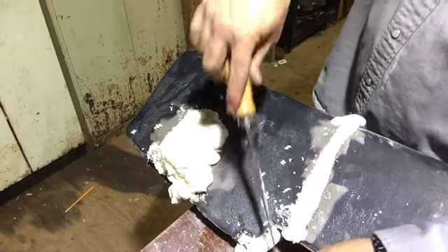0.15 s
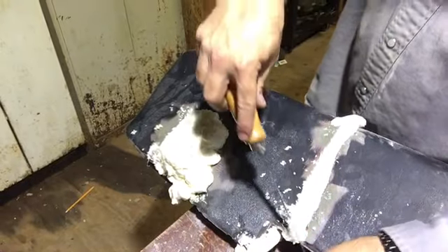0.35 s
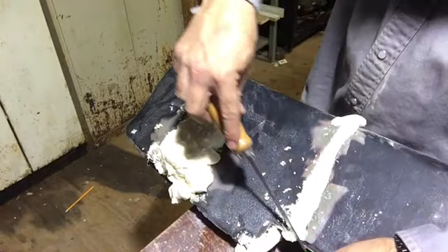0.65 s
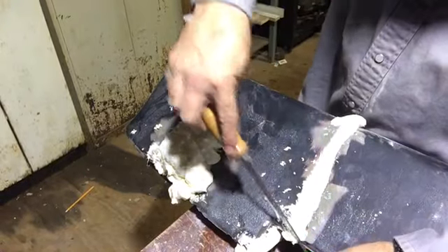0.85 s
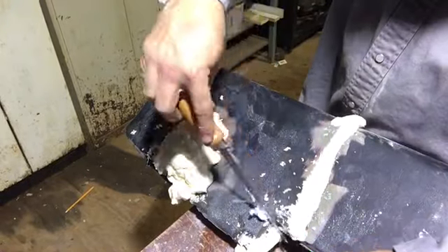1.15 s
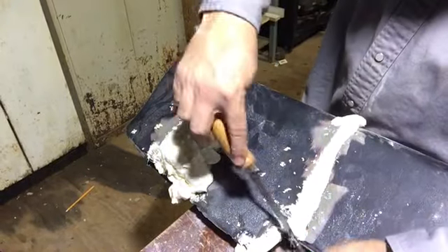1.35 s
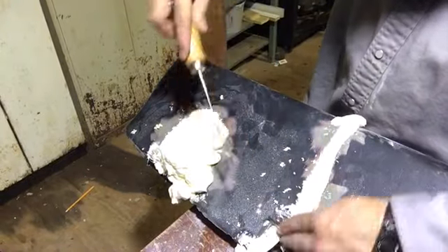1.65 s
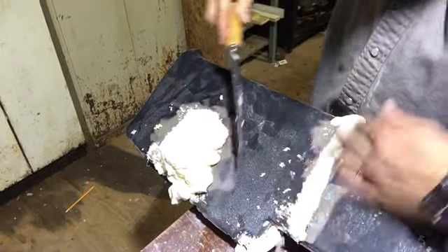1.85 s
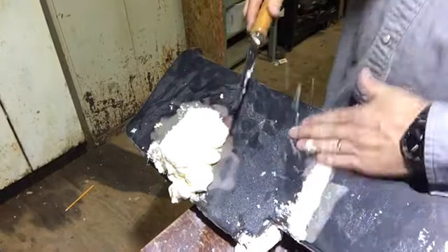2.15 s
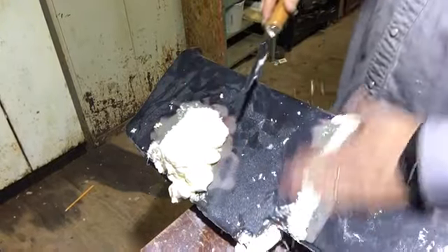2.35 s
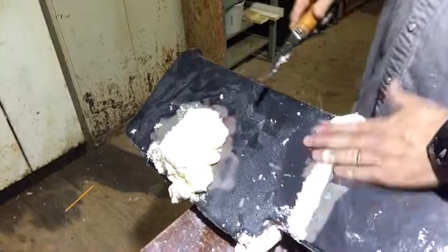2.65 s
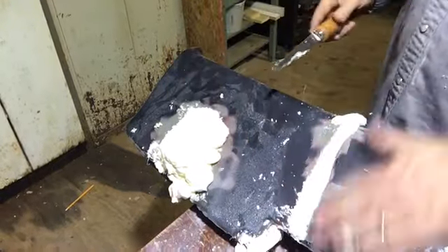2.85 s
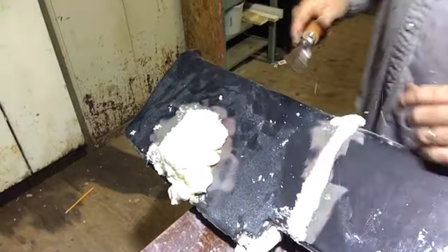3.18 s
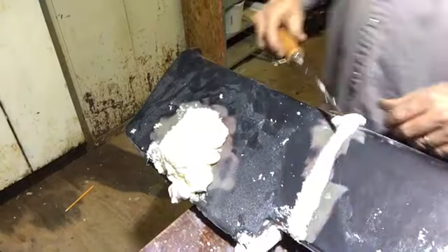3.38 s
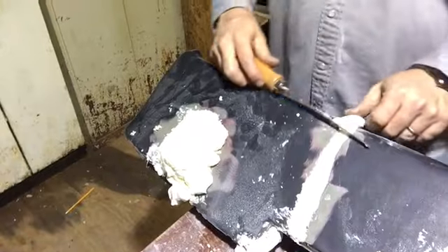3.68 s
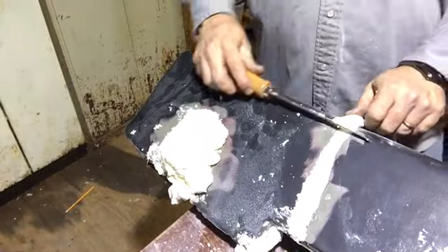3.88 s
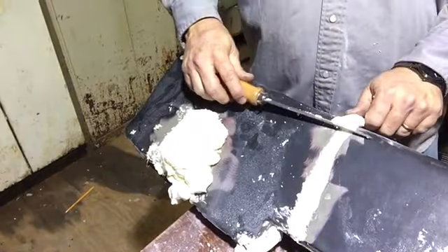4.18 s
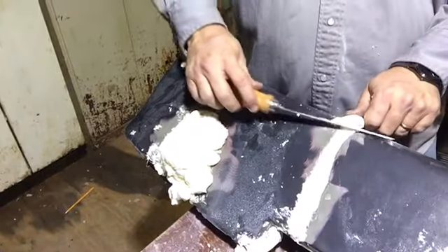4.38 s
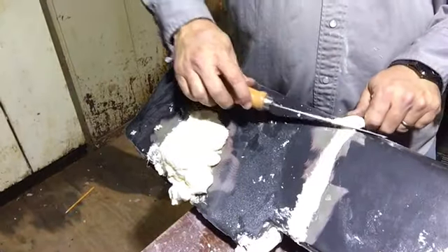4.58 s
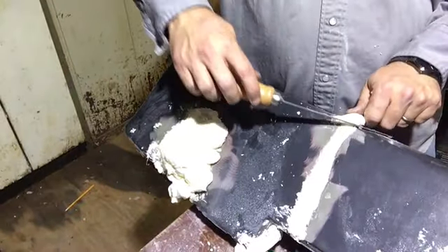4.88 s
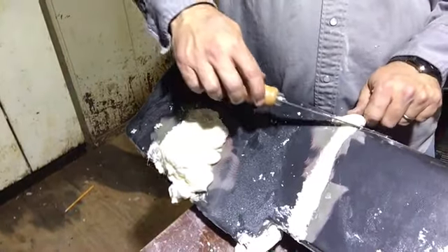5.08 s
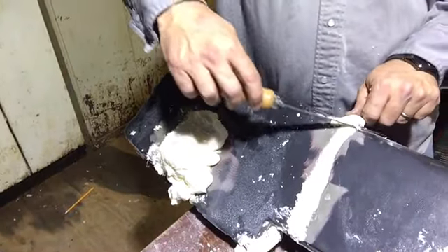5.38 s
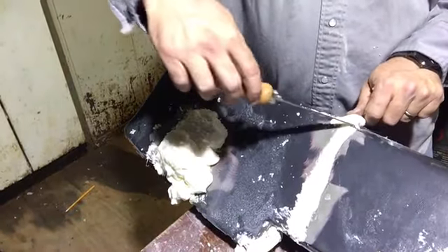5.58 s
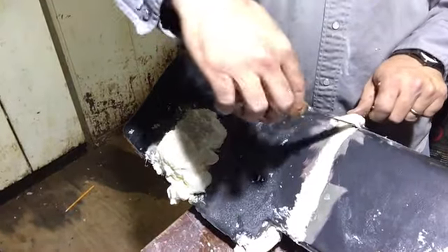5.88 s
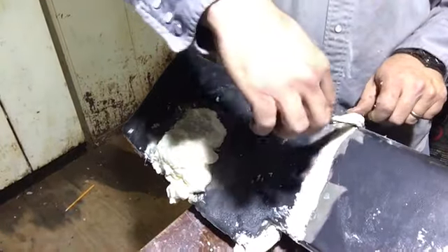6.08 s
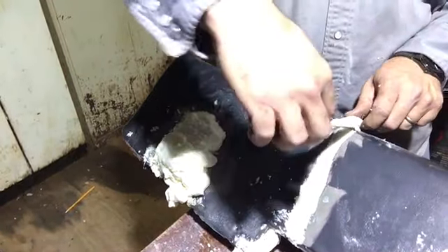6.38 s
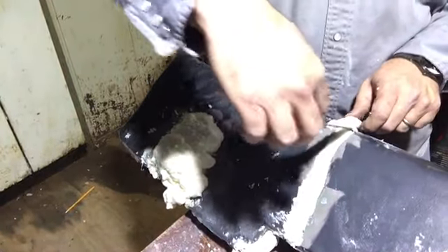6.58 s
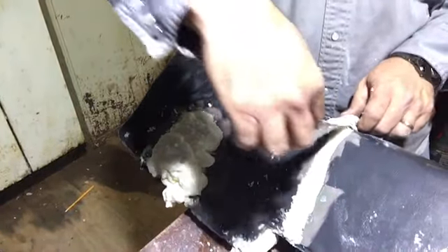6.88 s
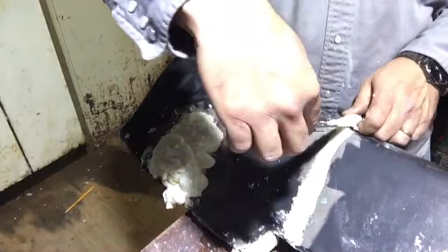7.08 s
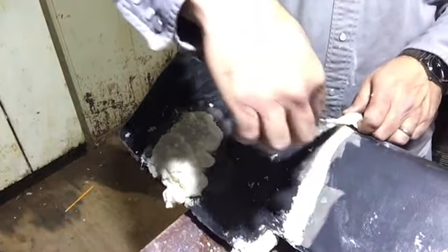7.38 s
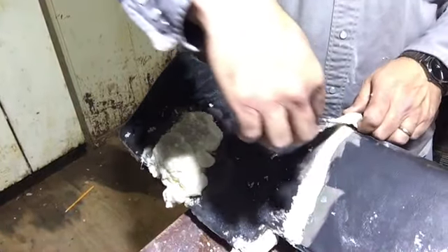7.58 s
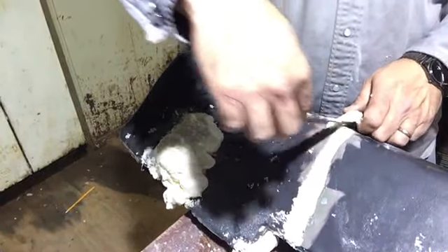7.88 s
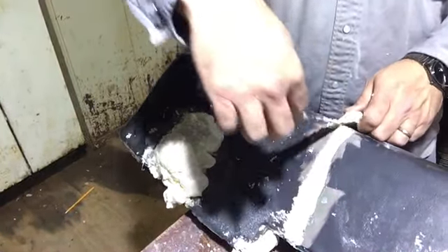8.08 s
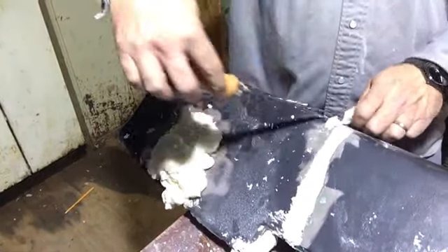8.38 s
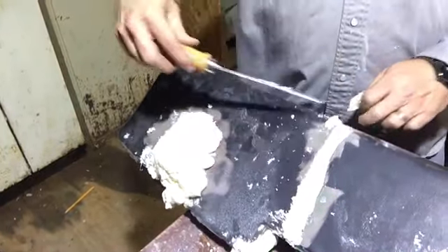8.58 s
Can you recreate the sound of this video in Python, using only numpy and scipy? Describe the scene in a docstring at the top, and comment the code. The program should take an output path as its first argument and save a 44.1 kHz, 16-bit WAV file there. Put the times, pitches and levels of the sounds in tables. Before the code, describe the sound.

Close, gritty knife strokes tear at hardened foam on a hollow plastic panel that thumps under the pressure. A palm then brushes the crumbs away, followed by soft bumps and a rustle of cloth. The knife saws back and forth again, hissing and rasping, slips once with a loud, booming clack, then trails off in lighter scrapes and crisp ticks. A low rumble and faint hiss fill the workshop behind it.

```python
"""A low rumble, room hiss and faint, brief fluttering tones come first, in a workshop. Then, close to the
microphone, a serrated knife saws hard foam off a hollow plastic panel: teeth tear foam cells (hiss and
rasp), foam snaps, the blade slips once and slaps the panel, which booms under all of it.
Between cuts a hand sweeps the crumbs away and a shirt rustles."""
import sys
import numpy as np
from scipy import signal
from scipy.fft import rfft, irfft, next_fast_len
from scipy.io import wavfile
from scipy.ndimage import uniform_filter1d, map_coordinates

SR = 44100
rng = np.random.default_rng(int(sys.argv[2]) if len(sys.argv) > 2 else 0)


def output_pcm(signal):
    """Save a mono or channel-first signal as 16-bit PCM at the path in sys.argv[1].

    Samples are clipped to [-1, 1] before scaling.
    """
    pcm = np.clip(np.atleast_2d(signal).T, -1, 1) * 32767
    wavfile.write(sys.argv[1], SR, np.round(pcm).astype(np.int16))


N = 385434


def amp(db):
    """Decibels to gain."""
    return 10 ** (np.asarray(db) / 20)


def unit(x):
    """Scaled to rms 1."""
    return x / np.sqrt(np.mean(x ** 2) + 1e-20)


def along(points, hz):
    """(frequency, value) points read at hz on a log axis."""
    f, v = np.transpose(points)
    return np.interp(np.log(hz + 1), np.log(f + 1), v)


def fader(points):
    """Gain per sample from (time [s], level [dB]) points."""
    return amp(np.interp(np.arange(N) / SR, *np.transpose(points)))


def wobble(rate):
    """A smooth random curve, rate knots a second."""
    knots = rng.standard_normal(int(N * rate / SR) + 4)
    return map_coordinates(knots, [np.arange(N) * rate / SR])


def filtered(x, response):
    """x times a complex response of frequency."""
    m = next_fast_len(N + SR // 2)
    return irfft(rfft(x, m) * response(np.fft.rfftfreq(m, 1 / SR)), m)[..., :N]


def resonated(push, modes):
    """A push through resonances, scaled so that white noise keeps its level."""
    def response(f):
        return sum((-1) ** k * amp(db) * 1j * f * width / (hz * hz - f * f + 1j * f * width)
                   for k, (hz, width, db) in enumerate(modes))
    power = np.mean(np.abs(response(np.linspace(1, SR / 2, 20000))) ** 2)
    return filtered(push, response) / np.sqrt(power)


def tearing(rate, spread_db, share):
    """Random pops of scattered size, rate a second, over smooth friction; share is their part of the power."""
    when, size, sign = rng.random((3, N))
    pops = (when < rate / SR) * amp(-spread_db * np.log(size + .01)) * np.sign(sign - .5)
    return np.sqrt(share) * unit(pops) + np.sqrt(1 - share) * rng.standard_normal(N)


def coloured(x, spectrum, patchy_db):
    """x through a spectrum, with patches of random gain in time and frequency; rms 1."""
    bands = signal.stft(x, nperseg=256)[2]
    patches = uniform_filter1d(uniform_filter1d(rng.standard_normal(bands.shape), 4, 0), 20, 1)
    x = signal.istft(bands * amp(patchy_db * unit(patches)), nperseg=256)[1][:N]
    return unit(filtered(x, lambda hz: amp(along(spectrum, hz))))


def strokes(table, peak, depth_db, squareness):
    """A gain curve per level column: a stroke speeds up for the share peak of its length, then slows."""
    power, t = np.zeros((len(table[0]) - 2, N)), np.arange(N) / SR
    for start, length, db, *relative_db in table:
        crest = start + peak * length
        near = slice(max(round((crest - .3) * SR), 0), round((crest + .3) * SR))
        side = np.where(t[near] < crest, peak * length, (1 - peak) * length)
        drop_db = depth_db * (np.abs(t[near] - crest) / side) ** squareness
        power[:, near] += amp(db + np.array([0, *relative_db])[:, None] - drop_db) ** 2
    return np.sqrt(power)


# decay of the workshop: (frequency [Hz], t60 [s])
SHOP_DECAY = [(200, 0.27), (2000, 0.39), (10000, 0.28)]
def shop_echo(x):
    """Each frequency of the shop's answer dies at its own speed."""
    hz, t, bands = signal.stft(rng.standard_normal(SR // 2), SR, nperseg=256)
    tail = signal.istft(bands * amp(-60 * t / along(SHOP_DECAY, hz)[:, None]), SR, nperseg=256)[1]
    delayed = np.pad(x, (200, 0))
    return signal.fftconvolve(delayed, tail / np.linalg.norm(tail))[:N]


# room tone all around the microphone: (frequency [Hz], level [dB])
AIR_SPECTRUM = [(88, -26), (150, 0.5), (475, -2.5), (960, -7.5), (2550, -11), (2810, -12), (4860, -17),
                (14000, -30), (16000, -32)]
# its slow drift: (time [s], level [dB])
AIR_LEVEL = [(0, -66.5), (.4, -64), (3.3, -61.5), (4.2, -68), (7.2, -69.5), (7.6, -73), (8.74, -70.5)]
def shop_air():
    """The air of the shop, a faint hiss."""
    return fader(AIR_LEVEL) * coloured(rng.standard_normal(N), AIR_SPECTRUM, patchy_db=.7)


# faint, brief tones: (start [s], length [s], pitch [Hz], level [dB])
FAINT_TONES = [(.001, .13, 3050, -79), (.068, .015, 5900, -79), (.072, .015, 4650, -79),
               (.138, .018, 7200, -72), (.15, .17, 2280, -71), (.325, .065, 4750, -70),
               (.74, .12, 2285, -72), (3.37, .14, 3420, -73), (3.51, .05, 4640, -71.5),
               (8.575, .04, 2850, -79)]
def faint_tones():
    """Faint, thin, brief tones that flutter in level."""
    out, flutter = np.zeros(N), amp(3 * wobble(60))
    for start, length, hz, db in FAINT_TONES:
        t = np.arange(round(length * SR)) / SR
        drift = np.cumsum(rng.standard_normal(len(t))) * .08
        tone = np.sin(2 * np.pi * hz * t + drift)
        out[round(start * SR):][:len(t)] += amp(db) * signal.windows.tukey(len(t), .4) * tone
    return out * flutter


# low end of the room: (frequency [Hz], level [dB])
RUMBLE_SPECTRUM = [(12, -35), (20, -18.5), (64, 4.5), (195, -12), (241, -14), (260, -10.5), (340, -43),
                   (570, -120)]
# its rise and fall: (time [s], level [dB])
RUMBLE_LEVEL = [(0, -60.5), (1.45, -47.5), (1.7, -58.5), (2.31, -50), (3.2, -53), (4, -58.5), (4.58, -55),
                (6.2, -59.5), (6.67, -51), (7.11, -57), (7.23, -66), (8.2, -66.5), (8.45, -70.5)]
def rumble():
    """A lumpy low rumble that swells after each bump of the bench."""
    rows = [(start, .15, db) for start, *_, db in BENCH_BUMPS]
    swells = strokes(rows, peak=.18, depth_db=9.5, squareness=1.1)[0]
    gain = np.hypot(fader(RUMBLE_LEVEL), swells) * amp(2.5 * wobble(11))
    return gain * coloured(rng.standard_normal(N), RUMBLE_SPECTRUM, patchy_db=.9)


# through the bench: (time [s], level [dB], pitch [Hz], t60 [s], rumble swell [dB])
BENCH_BUMPS = [(1.458, -34, 220, .19, -43), (3.022, -41.5, 107, 0.32, -50),
               (3.274, -30.5, 110.8, 0.35, -43.5), (3.805, -30, 199, 0.14, -41),
               (6.397, -26.5, 151, 0.32, -43), (8.241, -47, 144.6, .2, -62)]
def bumps():
    """Soft low pushes, each three inharmonic tones dying together."""
    out, t = np.zeros(N + SR), np.arange(SR // 2) / SR
    attack = 1 - np.exp(-t / .0017)
    for start, db, hz, t60, _ in BENCH_BUMPS:
        phase = 2 * np.pi * hz * t
        tone = np.sin(phase) + .45 * np.sin(.65 * phase) + .3 * np.sin(2.1 * phase)
        out[round(start * SR):][:len(t)] += amp(db - 60 * t / t60) * attack * tone
    return out[:N]


# the worker shifts at the bench: (start [s], length [s], level [dB])
SHIRT_MOVES = [(-.15, 0.88, -81), (3.1, .12, -52.5), (3.27, 0.065, -51), (3.43, 0.27, -61),
               (3.755, 0.19, -52.5)]
# cloth rubbing: (frequency [Hz], level [dB])
SHIRT_SPECTRUM = [(180, -43), (300, 0.5), (506, -10), (1860, -11), (2890, -16), (4620, -29.5), (8000, -52),
                  (10400, -73), (17600, -120)]
def shirt():
    """Soft, blotchy rustle of cloth as the body shifts."""
    gain = strokes(SHIRT_MOVES, peak=.67, depth_db=11.5, squareness=2.7)[0]
    return gain * coloured(tearing(900, spread_db=3.5, share=.64), SHIRT_SPECTRUM, patchy_db=5.5)


# the hollow panel, close by: (frequency [Hz], width [Hz], level [dB])
PANEL_MODES = [(134.4, 7.6, -12), (186.6, 18, -8.5), (311.8, 18.4, -3.5), (341.7, 20.2, 5),
               (352.9, 31.1, 4.5), (450.5, 22, -6.5), (467.7, 26, -9), (644, 10, -16.5)]
# blade or palm bears down: (middle [s], length [s], level [dB])
PANEL_THUMPS = [(.42, 0.031, -24), (0.455, 0.068, -28.5), (0.631, 0.18, -40), (0.914, 0.14, -38.5),
                (1.088, 0.11, -35.5), (1.195, 0.04, -45), (1.463, .12, -30.5), (1.832, 0.066, -38.5),
                (2.085, 0.15, -45), (2.228, 0.063, -32), (2.373, 0.081, -32.5), (2.457, 0.16, -40),
                (2.605, 0.055, -35), (2.693, 0.079, -41.5), (2.788, 0.11, -50.5), (3.81, 0.056, -45),
                (4.393, 0.042, -42), (4.71, 0.5, -58), (4.926, 0.11, -57), (6.19, 0.028, -64),
                (6.45, 0.093, -31), (6.513, 0.068, -25), (6.754, 0.098, -52), (8.262, 0.016, -54)]
# sharp knocks: (time [s], impulse [dB])
PANEL_KNOCKS = [(.398, 1.5), (1.273, -2), (1.311, 4.5), (2.929, -4), (6.323, -8.5), (6.365, 11),
                (6.521, 3.5), (8.222, -12.5)]
def panel():
    """Strokes, sweeps and blows shake the hollow panel, whose modes ring on."""
    leak = amp(-9.5) * cutting(depth_db=7, squareness=1.3)[2]  # every cut shakes it a little
    presses = [(middle - length / 2, length, db) for middle, length, db in PANEL_THUMPS]
    thumps = strokes(presses, peak=.5, depth_db=14.5, squareness=1.23)[0]
    after_knocks = [(start, .053, db - 36) for start, db in PANEL_KNOCKS]
    shudders = strokes(after_knocks, peak=.12, depth_db=13.5, squareness=1.4)[0]
    push = (np.hypot(thumps, shudders) + leak) * tearing(330, spread_db=3.5, share=.2)
    for start, db in PANEL_KNOCKS:
        push[round(start * SR)] += amp(db)
    dull = signal.sosfilt(signal.butter(2, 1100, fs=SR, output="sos"), push)  # plastic gives way
    return resonated(dull, PANEL_MODES)


# sweeps across the panel: (start [s], length [s], brush [dB], rub re brush [dB])
PALM_SWEEPS = [(1.67, .24, -48, -4.5), (1.996, 0.043, -48.5, -3), (2.027, 0.12, -40.5, -4),
               (2.172, 0.14, -40.5, -1), (2.292, .14, -42, 0), (2.42, .13, -40, -1), (2.53, 0.15, -40, -1),
               (2.671, 0.097, -39, -4.5), (2.758, 0.065, -64, -2)]
# palm or fingers land and slide off: same columns
PALM_SLAPS = [(2.918, 0.1, -41.5, -1.5), (3.047, 0.044, -69.5, 16.5), (8.352, 0.05, -68.5, 13)]
# bright brush of crumbs: (frequency [Hz], level [dB])
BRUSH_SPECTRUM = [(2350, -26), (4000, 0.5), (4870, -1), (5410, 4), (9330, 2.5), (10500, -2.5), (11500, 2),
                  (15100, -3.5), (16000, -15.5)]
# duller rub of the palm: (frequency [Hz], level [dB])
RUB_SPECTRUM = [(320, -51), (550, -4), (833, 1), (1060, 5), (1840, 2), (2320, 6), (3550, 8), (5000, -3.5),
                (6500, -35), (11000, -120)]
def hand():
    """The palm drags crumbs over the pebbled plastic."""
    sweeps = strokes(PALM_SWEEPS, peak=.46, depth_db=17, squareness=2.3)
    slaps = strokes(PALM_SLAPS, peak=.18, depth_db=14.5, squareness=1.7)
    brush_gain, rub_gain = np.hypot(sweeps, slaps) * amp(1.6 * wobble(40.42))
    brush = coloured(tearing(3000, spread_db=5.5, share=.36), BRUSH_SPECTRUM, patchy_db=1.5)
    rub = coloured(tearing(1500, spread_db=1, share=.19), RUB_SPECTRUM, patchy_db=1)
    return brush_gain * brush + rub_gain * rub


# the struck blade: (frequency [Hz], level [dB], t60 [s])
BLADE_MODES = [(1030, 1, 0.079), (1835, -3, 0.026), (2140, -2, 0.094), (2464, -12.5, 0.066),
               (2840, -11, 0.13), (3900, -11, 0.022), (4970, -14, 0.058), (6800, -11.5, 0.083),
               (8460, -9, 0.045)]
# blows to it: (time [s], level [dB])
BLADE_BLOWS = [(1.085, -38), (6.361, -22), (6.367, -40.5), (8.244, -63.5)]
def blade():
    """Steel modes, roughened by the grip of the foam, at new strengths for every blow."""
    out, t = np.zeros(N + SR), np.arange(SR // 2) / SR
    for start, db in BLADE_BLOWS:
        for hz, mode_db, t60 in BLADE_MODES:
            drift = np.cumsum(rng.standard_normal(len(t))) * .06
            fade = amp(db + mode_db + rng.normal(0, 1.6) - 60 * t / t60)
            out[round(start * SR):][:len(t)] += fade * np.sin(2 * np.pi * hz * t + drift)
    return out[:N]


# close snaps and blows: (time [s], level [dB], pitch [Hz], spike re level [dB])
FOAM_SNAPS = [(0.397, -40, 970, -9), (0.4426, -42, 1790, -15), (1.084, -31.5, 1050, 0),
              (1.218, -37.5, 2040, 6), (1.269, -28.5, 940, 1.5), (1.308, -26, 1040, -6),
              (1.416, -37.5, 980, -14.5), (1.999, -44.5, 3850, -2), (2.928, -32.5, 1170, -3),
              (3.053, -34, 3040, -28), (4.022, -48, 1290, -20), (4.365, -32.5, 1290, -13),
              (5.2696, -45, 1350, 1), (5.567, -37, 1300, 11), (5.965, -48.5, 1340, -12),
              (6.282, -36, 1220, -10), (6.325, -28.5, 890, -6), (6.36, -11, 2440, -23),
              (6.369, -25, 5400, -13.5), (6.696, -48, 1300, -12), (6.717, -34.5, 1000, -21),
              (6.765, -29, 1150, -19), (6.772, -29.5, 1190, -9), (6.869, -39, 4570, 5),
              (6.921, -46, 4300, 4.5), (7.165, -42, 1250, -2), (7.192, -41.5, 2460, 7.5),
              (7.208, -41, 4040, 0), (7.715, -48, 1420, -14), (7.751, -47, 4020, -2), (7.88, -37, 1160, 7),
              (7.913, -35.5, 2550, 2.5), (8.063, -57, 1010, -1), (8.201, -32, 1120, 2),
              (8.221, -38.5, 3160, 4.5), (8.229, -40, 2610, 0), (8.245, -37.5, 2010, -15)]
def snaps(tick_t60_s=.014, crumbs_t60_s=.0046, spike_s=.00006):
    """A sharp spike with a spit of crumbs, then a short rough tick of the piece that breaks."""
    out, t = np.zeros(N + SR), np.arange(SR // 8) / SR
    spike = 2.5 * (1 - t / spike_s) * np.exp(-t / spike_s)
    for start, db, hz, spike_db in FOAM_SNAPS:
        phase = 2 * np.pi * hz * t
        tick = 1.21 * np.sin(phase) + .19 * np.sin(2.316 * phase) + .22 * rng.standard_normal(len(t))
        tick *= amp(db - 60 * t / tick_t60_s)
        crumbs = 1.2 * amp(-60 * t / crumbs_t60_s) * rng.standard_normal(len(t))
        out[round(start * SR):][:len(t)] += tick + amp(db + spike_db) * (spike + crumbs)
    return signal.sosfilt(signal.butter(2, [600, 8500], "bandpass", fs=SR, output="sos"), out)[:N]


# sawing: (start [s], length [s], hiss [dB], rasp re hiss [dB])
SAW_STROKES = [(0.433, 0.094, -62, -2), (0.558, 0.18, -52.5, -10.5), (0.842, 0.15, -52, -10),
               (0.987, 0.11, -49.5, -14.5), (1.417, .12, -48.5, 3), (3.766, 0.12, -63.5, 10.5),
               (3.902, 0.086, -61, -0.5), (3.994, 0.098, -67, 2.5), (4.272, 0.18, -48, -1.5),
               (4.477, 0.16, -54, -3), (4.656, 0.16, -52.5, 1), (4.832, 0.15, -50.5, -7.5),
               (4.988, 0.15, -54, -5), (5.163, 0.15, -50.5, -6.5), (5.31, 0.19, -53.5, -3.5),
               (5.504, 0.13, -46, -4), (5.636, 0.08, -61.5, 12.5), (5.666, 0.15, -49, 2.5),
               (5.817, 0.14, -56.5, 3.5), (5.961, 0.14, -48.5, 5), (6.119, 0.13, -47, 0),
               (6.276, 0.079, -45, 8.5), (6.351, .29, -53.5, 4.5), (6.703, 0.11, -47, -1.2),
               (6.803, 0.18, -47.5, -7.5), (7.02, 0.09, -52.5, -3.5), (7.14, 0.11, -55, 0.5),
               (7.304, 0.097, -62, 1), (7.429, 0.13, -67, 2), (7.577, 0.076, -74.5, 2),
               (7.7, 0.074, -68, 8), (7.832, 0.059, -64.5, -4), (7.959, 0.051, -76, 2),
               (8.152, 0.071, -67, -0.5)]
# grind re hiss, stronger in the first cut: (time [s], level [dB])
GRIND_LEVEL = [(1.5, 5), (4.3, -2.95), (7.8, -0.8)]
# sudden skids: (start [s], length [s], hiss [dB], grind re hiss [dB], rasp re hiss [dB])
BLADE_SKIDS = [(.387, 0.1, -71.5, 21.5, 12.5), (1.077, 0.092, -43.5, 1, -3), (1.21, 0.058, -50.5, -1, -4),
               (1.264, 0.049, -48, 1, -2), (1.304, .065, -55.5, 3.5, 0), (1.406, 0.089, -47.5, 1, -6),
               (6.352, 0.08, -35.5, 4.5, 5), (7.881, 0.0194, -55, 4, -1.5), (7.914, .028, -68, 12, 1.5),
               (8.045, 0.027, -77.5, 9.5, 9), (8.194, .042, -57, 2.5, -5), (8.222, 0.051, -59, 12.5, -2)]
def cutting(depth_db, squareness):
    """Hiss, grind and rasp gains of strokes and skids; the grind of a stroke follows its rasp."""
    rows = [(start, length, db, .66 * rasp_db, rasp_db) for start, length, db, rasp_db in SAW_STROKES]
    hiss, grind, rasp = strokes(rows, .6, depth_db, squareness)
    skids = strokes(BLADE_SKIDS, .18, depth_db, squareness)
    return np.hypot([hiss, grind * fader(GRIND_LEVEL), rasp], skids)


# cells tearing, close to the microphone: (frequency [Hz], level [dB])
HISS_SPECTRUM = [(2060, -22), (3500, -12), (4340, -2), (5000, -5), (6910, -1), (8000, -6), (8970, -1.5),
                 (10200, -9), (11200, -5.5), (15100, -10.5), (16000, -10)]
# the finest hiss, above 10.5 kHz: (time [s], level [dB])
FIZZ_LEVEL = [(.5, 8), (1.5, 0), (4.3, 4), (5.5, -3.5), (6.4, -9.5), (7.2, 2)]
# midrange of the cut: (frequency [Hz], level [dB])
GRIND_SPECTRUM = [(290, -40), (500, -7.5), (642, -6), (1320, -6.5), (1730, -5), (2080, -2), (3340, -7),
                  (4370, -13), (5000, -23), (6500, -44.5), (11000, -120)]
# foam lump on the blade: (frequency [Hz], width [Hz], level [dB])
LUMP_MODES = [(940, 120, -2), (1112, 120, -0.5), (1252, 79, 0.5), (1365, 69, 1.5), (1539, 160, -7)]
# steel singing under the teeth: same columns
SING_MODES = [(2924, 35, 2.5), (3620, 290, -0.5), (4450, 98, -6), (5380, 160, -0.5), (6830, 260, -5.5)]
# that singing re the cut: (time [s], level [dB])
SING_LEVEL = [(.5, -5.5), (4.3, -9), (6.6, -6.5), (6.9, 2), (7.3, -6.5)]
def knife():
    """Each stroke: fine hiss of torn cells, a mid grind, a lumpy rasp and a faint singing of the steel."""
    hiss_gain, grind_gain, rasp_gain = cutting(depth_db=15, squareness=2.5)
    catch = wobble(60)  # teeth catch and let go
    large_cells = amp(-7.5) * tearing(200, spread_db=3, share=.75)
    dust = coloured(large_cells + tearing(2500, spread_db=3, share=.55), HISS_SPECTRUM, patchy_db=1.4)
    fizz = filtered(dust, lambda hz: 1 / (1 + (10500 / (hz + 1)) ** 8))
    hiss = hiss_gain * amp(2 * catch) * (dust + (fader(FIZZ_LEVEL) - 1) * fizz)
    sing = fader(SING_LEVEL) * np.sqrt(hiss_gain * grind_gain) * tearing(800, spread_db=0, share=.5)
    grit = coloured(tearing(1200, spread_db=3, share=.4), GRIND_SPECTRUM, patchy_db=1.8)
    grind = grind_gain * amp(.95 * catch) * grit
    teeth = rasp_gain * amp(2.3 * catch) * tearing(450, spread_db=3, share=.8)
    return hiss + grind + resonated(teeth, LUMP_MODES) + resonated(sing, SING_MODES)


def scene():
    """One microphone at the bench: the work, mostly direct, its echo and the background."""
    friction = knife() + hand() + shirt()
    hits = snaps() + blade() + bumps()
    tones, boom = faint_tones(), panel()
    echo = shop_echo(amp(-14) * boom + amp(-8.5) * friction + amp(-11.5) * hits + tones)
    return (friction + boom + hits + tones + echo + rumble() + shop_air())[None]


TOP_HZ = 15830
def record(dry):
    """The recorder keeps nothing above its band limit."""
    return filtered(dry, lambda hz: hz < TOP_HZ)


dry = scene()
out = record(dry)
output_pcm(out)
```